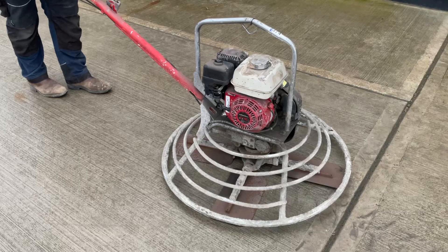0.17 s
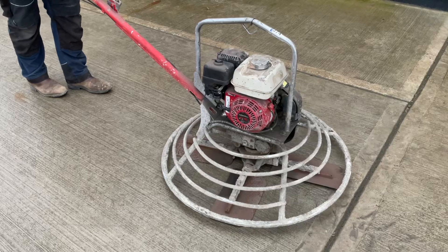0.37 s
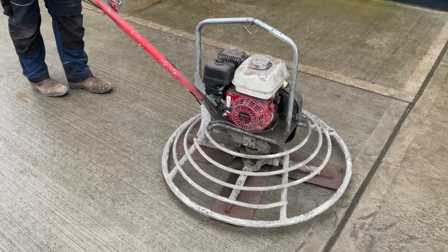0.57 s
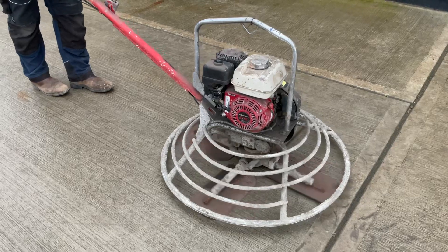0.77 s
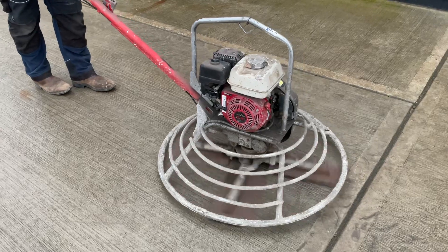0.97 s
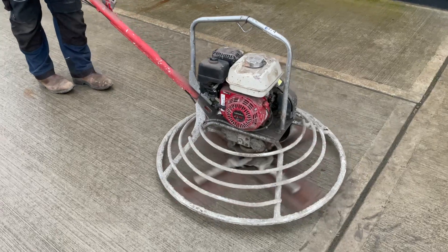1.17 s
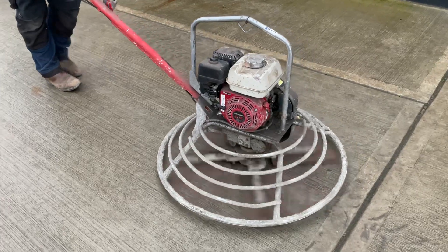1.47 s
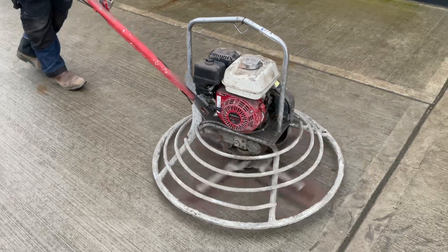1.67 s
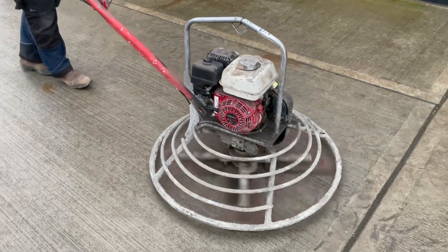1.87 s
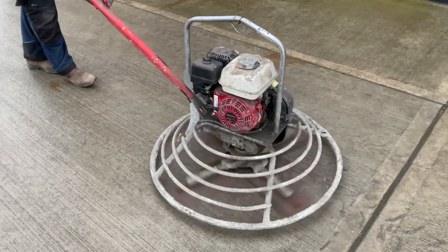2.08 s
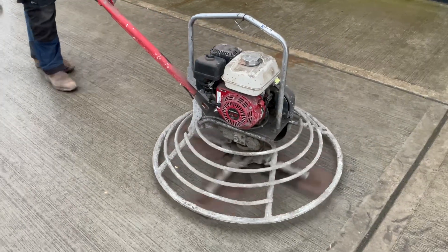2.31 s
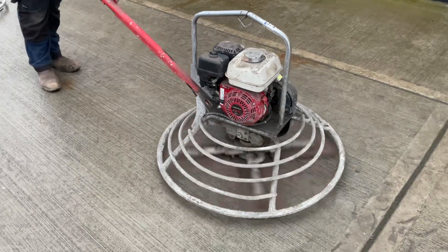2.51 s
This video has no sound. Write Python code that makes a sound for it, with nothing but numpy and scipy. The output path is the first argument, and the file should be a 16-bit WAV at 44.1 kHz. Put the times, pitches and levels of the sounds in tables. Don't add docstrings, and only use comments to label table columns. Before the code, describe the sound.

A petrol power trowel idles, its clutch chatters and squeals, then steel blades scrape round on concrete

```python
import sys
import numpy as np
from scipy import signal
from scipy.fft import rfft, irfft
from scipy.io import wavfile
from scipy.ndimage import uniform_filter1d

SR = 44100
rng = np.random.default_rng(int(sys.argv[2]) if len(sys.argv) > 2 else 0)


def volts_from_decibels(level):
    exponent = np.asarray(level, float) / 20
    return 10 ** exponent


def wav_out(sig):
    wavfile.write(sys.argv[1], SR, np.round(np.clip(np.atleast_2d(sig).T, -1, 1) * 32767).astype(np.int16))


N = 116865
TIME_S = np.arange(N) / SR

# t/s, firing rate f/Hz, exhaust level/dB, casing shake level/dB
ENGINE = [(0.04, 30.9, -16, 2), (0.21, 30.76, -16, 1.5), (0.32, 30.06, -19, 2.35), (0.49, 27.65, -14, -4),
          (0.61, 28.23, -11.5, -5.5), (0.66, 27.37, -18, 0.5), (0.75, 26.53, -19.5, 14.5),
          (0.82, 26.9, -25.5, 8), (1.0, 26.37, -30, -7), (1.09, 26.83, -33, -9), (1.25, 29.13, -30, -9),
          (1.4, 29.63, -35.5, -16), (1.67, 28.55, -38.5, 13), (2.04, 29.41, -39, 1),
          (2.22, 27.94, -39.5, -17), (2.47, 29.45, -42, -9), (2.56, 29.37, -43, 17), (2.65, 29.43, -40, 0)]


def evened(x):
    return x / np.sqrt(np.mean(x ** 2) + 1e-20)


def read(points, hz):
    f, value = np.transpose(points)
    return np.interp(np.log(hz + 1), np.log(f + 1), value)


def curve(table, col):
    rows = np.array(table)
    return np.interp(TIME_S, rows[:, 0], rows[:, col])


def coloured(x, points):
    gain = volts_from_decibels(read(points, np.fft.rfftfreq(len(x), 1 / SR)))
    return evened(irfft(rfft(x) * gain, len(x)))


def low_part(x, hz):
    return signal.filtfilt(*signal.butter(2, hz, fs=SR), x)


def drift(low_hz, top_hz):
    t = np.arange(0, N + 64, 64) / SR
    rates_hz = np.geomspace(low_hz, top_hz, 20)
    v = sum(np.sin(2 * np.pi * (f * t + rng.random())) / np.sqrt(f) for f in rates_hz)
    return evened(np.interp(TIME_S, t, v))


def ring(x, hz, width):
    turn = np.exp(2j * np.pi * np.cumsum(hz * np.ones(len(x))) / SR)
    r = np.exp(-np.pi * width / SR)
    return 2 * (turn * signal.lfilter([1 - r], [1, -r], x / turn)).real


def random_field(shape, bins):
    field = uniform_filter1d(rng.standard_normal(shape), size=bins, axis=0)
    return evened(uniform_filter1d(field, size=6, axis=1))


def patchy(x, db):
    z = signal.stft(x, nperseg=512)[2]
    z = z * volts_from_decibels(db * random_field(z.shape, bins=6))
    return evened(signal.istft(z, nperseg=512)[1][:N])


def firing_turns():
    turns = np.cumsum(curve(ENGINE, col=1)) / SR
    return turns - turns[round(0.5448 * SR)]


def exhaust():
    # multiple of firing rate, level/dB
    idling = [(1, -26), (2, -6), (3, -8), (4, -9), (5, 0), (6, -7), (7, -13), (8, -12), (9, -7), (10, -6),
              (11, -20), (12, -13), (13, -12), (14, -7), (15, -15), (16, -17), (17, -11), (18, -12),
              (19, -15), (20, -17), (21, -18), (22, -10), (23, -16), (24, -13)]
    labouring = [(1, -33), (2, -5), (3, -7), (4, -21), (5, 0), (6, -7), (7, -9), (8, -18), (9, -12),
                 (10, -11), (11, -12), (12, -9), (13, -12), (14, -17), (15, -17), (16, -17), (17, -16),
                 (18, -13), (19, -10), (20, -13), (21, -16), (22, -15), (23, -21), (24, -17)]
    running = [(1, -30), (2, -3), (3, -4), (4, -13), (5, 0), (6, -2), (7, -12), (8, -18), (9, -10),
               (10, -11), (11, -9), (12, -7), (13, -6), (14, -12), (15, -14), (16, -14), (17, -14),
               (18, -9), (19, -5), (20, -2), (21, -9), (22, -14), (23, -6), (24, -10)]
    settled = [(1, -28), (2, -2), (3, -4), (4, -14), (5, 0), (6, -11), (7, -5), (8, -8), (9, -10), (10, -9),
               (11, -9), (12, -13), (13, -14), (14, -14), (15, -12), (16, -10), (17, -8), (18, -5),
               (19, -8), (20, -10), (21, -14), (22, -14), (23, -14), (24, -14)]
    states_s = (.38, .5, .63, .8, 1.05, 1.3)
    # t/s, level per order/dB
    choke = [
        (.625, 0),
        (.65, -.35),
        (.76, -.3),
        (.84, 0),
    ]
    turns = firing_turns()
    choke_db = curve(choke, col=1)
    tone = np.zeros(N)
    for (k, idle), (_, drag), (_, run), (_, rest) in zip(idling, labouring, running, settled):
        order_db = np.interp(TIME_S, states_s, (idle, drag, drag, run, run, rest)) + k * choke_db
        waver_db = (0.5 + 0.09 * k) * drift(1.535, 8.1)
        second_stroke = 1 + 0.7 * np.exp(-2j * np.pi * k * 0.62)
        suck = 1 - 0.9 * np.exp(-2j * np.pi * k * 0.125)
        phase = np.angle(second_stroke * suck)
        tone += volts_from_decibels(order_db + waver_db) * np.cos(2 * np.pi * k * turns + phase)
    return volts_from_decibels(curve(ENGINE, col=2) + 0.2) * evened(tone)


def casing_clatter():
    # f/Hz, level/dB
    clatter_tone = [(60, 1), (300, -10.5), (450, -3), (680, -5), (1280, -4.5), (2800, -14), (6500, -24.5),
                    (16000, -43)]
    puff_depth, puff_turns, puff_lag_turns = 0.22, 0.28, 0.38
    since_firing = (firing_turns() + puff_lag_turns) % 1
    puff = 1 - puff_depth + puff_depth * 3 * np.exp(-since_firing / puff_turns)
    clatter = patchy(coloured(puff * rng.standard_normal(N), clatter_tone), db=2)
    dull = low_part(clatter, 2000)
    shake_db = curve(ENGINE, col=3)
    clatter = volts_from_decibels(shake_db) * dull + volts_from_decibels(1.77 * shake_db) * (clatter - dull)
    bite_s, bite_db = 0.635, -11
    calm_db = bite_db * np.clip((TIME_S - bite_s) / 0.003, 0, 1)
    return volts_from_decibels(1.73 - 18 + calm_db + curve(ENGINE, col=2) + 15.5) * clatter


def clutch_knocks():
    # t/s, level/dB
    knocks = [(0.446, -30), (.4826, -22.5), (.491, -37), (0.497, -29), (.5181, -20.5), (.526, -36),
              (.534, -29), (0.553, -19.5), (0.562, -30), (0.568, -25), (0.5882, -18.5), (.596, -29),
              (.605, -21), (.612, -45), (.6253, -18), (.6543, -14), (.662, -35), (.686, -29), (0.697, -20),
              (.7291, -35), (.746, -23), (.7535, -32), (2.230, -38), (2.412, -20)]
    # f/Hz, level/dB
    knock_tone = [(500, -9), (2800, 3.5), (5000, 0), (9000, -6.5), (16000, -22)]
    rise_s, fall_s = 0.001, 0.0055
    shape = np.zeros(N)
    for s, db in knocks:
        u = np.maximum(TIME_S - s, 0)
        shape += volts_from_decibels(db) * np.minimum(u / rise_s, 1) * np.exp(-u / fall_s) * 2
    return shape * coloured(rng.standard_normal(N), knock_tone)


def clutch_squeals():
    # t/s, length/s, level/dB, f/Hz
    squeals = [(.518, .007, -25, 4400), (.519, .007, -23, 5900), (.587, .010, -20, 5800),
               (.625, .012, -8, 2950), (.634, .014, -8, 2680), (.637, .008, -20, 5050),
               (.641, .012, -16, 3850), (.647, .016, -22, 1900), (.653, .010, -13, 2680),
               (.660, .010, -21, 6500), (.666, .008, -16, 2700), (.676, .017, -9, 2900)]
    sag, roughness = 0.05, 0.3
    fuzz = uniform_filter1d(rng.standard_normal(N), size=40) * np.sqrt(40)
    out = np.zeros(N)
    for s, length, db, hz in squeals:
        u = np.clip((TIME_S - s) / length, 0, 1)
        swell = np.sin(np.pi * np.sqrt(u)) * (1 + roughness * fuzz)
        out += volts_from_decibels(db) * swell * np.sin(2 * np.pi * hz * length * (u - sag * u * u / 2))
    return out


def blades():
    # t/s, level/dB
    pressure = [(.6, -32), (.648, -25), (.67, -21.5), (.72, -23), (.745, -18.5), (.78, -12.5), (.82, -13.5),
                (1.0, -12.5), (1.2, -13), (1.33, -13), (1.45, -13.5), (1.55, -16), (1.71, -17), (1.89, -16),
                (2.07, -16.5), (2.22, -18), (2.45, -18.5), (2.65, -19)]
    # f/Hz, level/dB
    scrape_tone = [(200, -29), (400, -31.5), (600, -12), (2000, -8.5), (4000, -8.5), (6000, -9.5),
                   (9000, -17), (16000, -39)]
    # f/Hz, width/Hz, level/dB
    modes = [(513, 39, -20.5), (857, 73, -17.5), (1220, 34, -19), (1715, 140, -15.5), (1893, 160, -16),
             (2590, 840, -20.5), (2850, 170, -28), (3420, 43, -26), (4300, 460, -33.5), (5700, 910, -27.5)]
    grit_per_s, grit_db = 5900, -0.5
    grit = volts_from_decibels(grit_db * np.minimum(rng.exponential(1, N), 5)) * (rng.random(N) < grit_per_s / SR)
    grit = evened(grit * rng.choice([-1, 1], N))
    grit = evened(grit + 2.86 * rng.standard_normal(N))
    rings = np.zeros(N)
    for hz, width, db in modes:
        level = volts_from_decibels(db + 1.1 * drift(1.965, 14))
        rings += level * evened(ring(grit, hz * (1 + 0.024 * drift(1.0, 14)), width))
    scrape = patchy(coloured(grit, scrape_tone) + rings, db=1)
    body = low_part(scrape, 1300)
    press_db = curve(pressure, col=1)
    scrape = scrape - body + body * volts_from_decibels(0.7 * (press_db + 14.5))
    sweep_db, flicker_db = 0.53 * drift(2.965, 11), 0.5 * drift(15, 70)
    return scrape * volts_from_decibels(press_db + sweep_db + flicker_db)


def cover():
    # f/Hz, width/Hz, level/dB
    plate_modes = [
        (3338, 65, -36.5),
        (4200, 200, -43),
    ]
    until_s = 0.34
    out = np.zeros(N)
    for hz, width, db in plate_modes:
        out += volts_from_decibels(db) * evened(ring(ring(rng.standard_normal(N), hz, width), hz, width))
    return np.clip((until_s - TIME_S) / 0.036, 0, 1) * out


def bump():
    start_s, db, hz, decay_s = 0.069, -12, 95, 0.012
    u = np.maximum(TIME_S - start_s, 0)
    return volts_from_decibels(db) * np.exp(-u / decay_s) * np.sin(2 * np.pi * hz * u)


def scene():
    # f/Hz, phase/rad
    lead = [(0, 0), (130, -.27), (800, -.55), (1250, .6), (1550, -.9), (2950, -4.0), (3620, -6.28),
            (6200, -6.2), (7000, -5.1)]
    # f/Hz, level/dB
    tilt = [(60, .8), (140, 1.4), (450, 2.2), (740, 5.8), (1300, 4.5), (2010, 3), (2600, 1.8), (5700, -4)]
    # f/Hz, coherence (0 to 1)
    alike = [(60, .999), (300, .993), (600, .85), (1000, .8), (2000, .93), (2600, .95), (3700, .93),
             (6000, .9)]
    x = exhaust() + casing_clatter() + clutch_knocks() + clutch_squeals() + blades() + cover() + bump()
    hz = np.fft.rfftfreq(N, 1 / SR)
    bounce_s, bounce_db, bounce_from_hz = 0.00229, -14, 900
    bounce = volts_from_decibels(bounce_db) * hz ** 2 / (hz ** 2 + bounce_from_hz ** 2)
    z = rfft(x) * (1 - bounce * np.exp(-2j * np.pi * hz * bounce_s))
    scatter_t60_s = 0.12
    tail = rng.standard_normal(8000) * volts_from_decibels(-60 * np.arange(8000) / SR / scatter_t60_s)
    same = np.clip(read(alike, hz), 0, 1)
    direct = np.sqrt((1 + same) / 2)
    scattered = np.sqrt((1 - same) / 2) * rfft(tail / np.linalg.norm(tail), N)
    port = volts_from_decibels(read(tilt, hz) / 2) * np.exp(0.5j * np.interp(hz, *np.transpose(lead)))
    left = irfft(z * (direct + scattered) * port, N)
    right = irfft(z * (direct - scattered) / port, N)
    return np.array([left, right])


def joined(x):
    # t/s, length/s, f/Hz, width/Hz
    shared_holes = [(.08, .04, 2470, 200), (.105, .04, 2680, 120), (.23, .05, 2470, 200), (.43, .04, 2650, 100),
                    (.71, .05, 2350, 100), (.76, .07, 2680, 180), (.915, .08, 2730, 230), (1.07, .07, 2620, 100),
                    (1.41, .07, 2670, 120), (1.8, .04, 2700, 140)]
    hz, t, z = signal.stft(x, SR, nperseg=1024)
    f = hz[:, None]
    gap_top_hz = 4400 + 380 * np.interp(t, TIME_S, drift(2.005, 25))
    sway = 0.3 * np.minimum(f / 1500, 1) * random_field(z[0].shape, bins=14)
    turn = np.interp(t, (0.66, 0.74), (-0.12, 0.27)) * np.exp(-((f - 2600) / 600) ** 2)
    shift = np.exp(0.5j * (sway + turn))
    z = np.array([z[0] * shift, z[1] / shift])
    gone = np.zeros(z[0].shape, bool)
    for s, length, centre, width in shared_holes:
        gone |= (abs(t - s) < length / 2) & (abs(f - centre) < width / 2)
    z = z - gone * z.mean(0)
    mono = (f > 7700) | ((f > 3650) & (f < gap_top_hz))
    both = np.sqrt((abs(z) ** 2).mean(0)) * np.exp(1j * np.angle(z[0] / shift))
    return signal.istft(np.where(mono, both, z), SR, nperseg=1024)[1][:, :N]


def top_cut(x):
    return signal.sosfilt(signal.butter(12, 16460, fs=SR, output="sos"), x)


def record(dry):
    x = signal.sosfilt(signal.butter(3, 40, "high", fs=SR, output="sos"), dry)
    x = joined(np.tanh(x * 0.95) / 0.95)
    start_s, idle_db = 0.0365, -86
    x = np.where(TIME_S > start_s, x, volts_from_decibels(idle_db) * rng.standard_normal(N))
    edge = signal.firwin(1535, 15770, window=("kaiser", 9), fs=SR)
    x = signal.oaconvolve(x, edge[None], "same")
    return top_cut(x)


dry = scene()
out = record(dry)
wav_out(out)
```